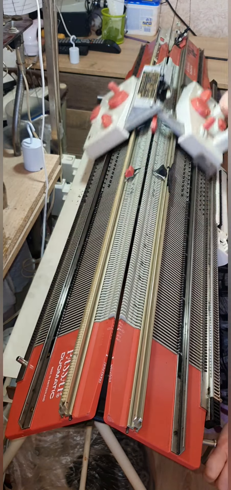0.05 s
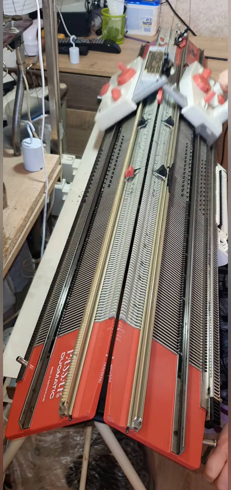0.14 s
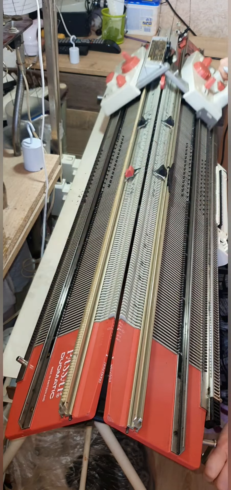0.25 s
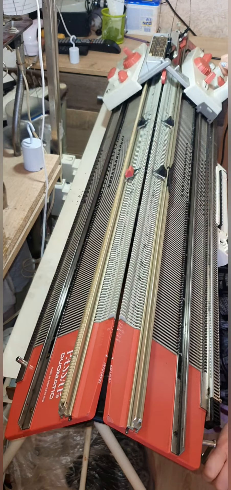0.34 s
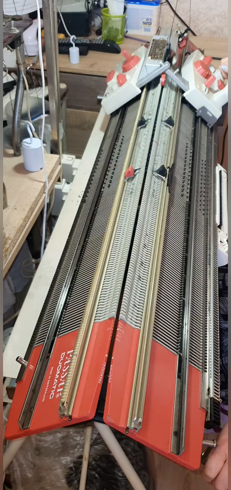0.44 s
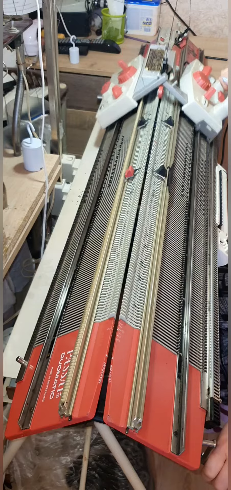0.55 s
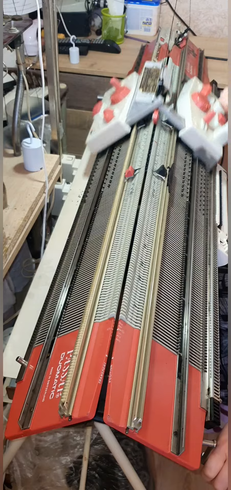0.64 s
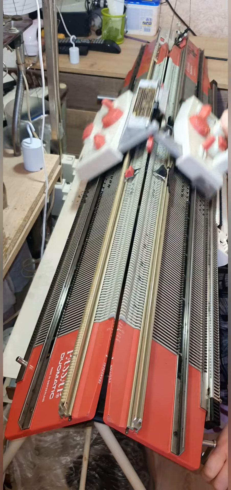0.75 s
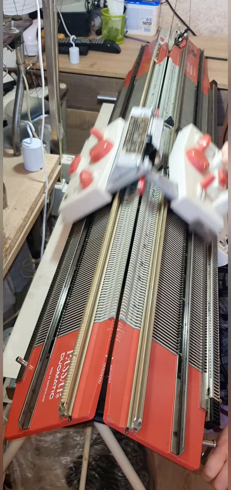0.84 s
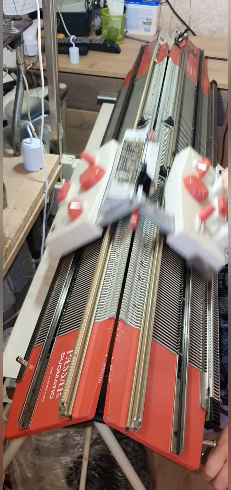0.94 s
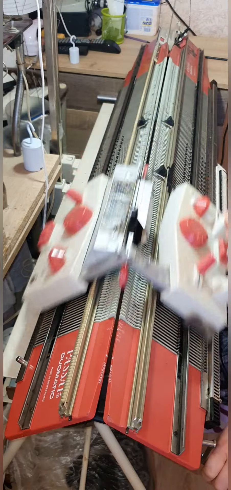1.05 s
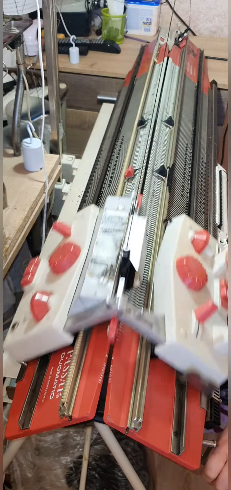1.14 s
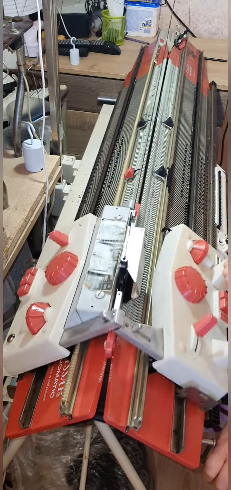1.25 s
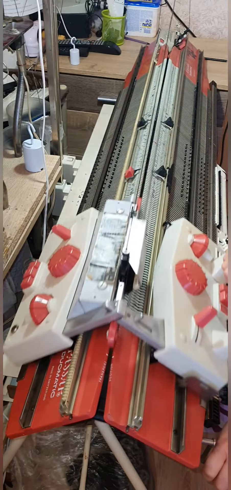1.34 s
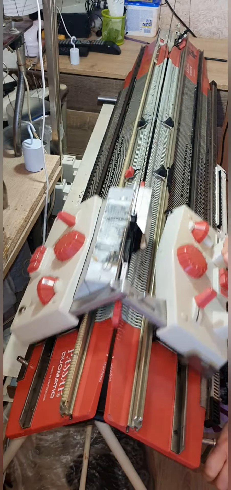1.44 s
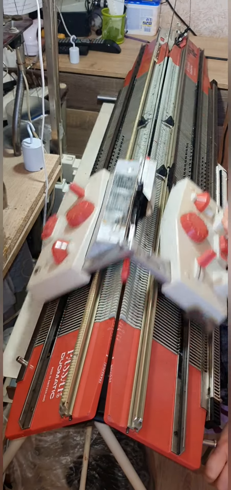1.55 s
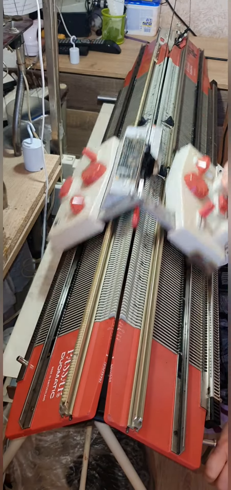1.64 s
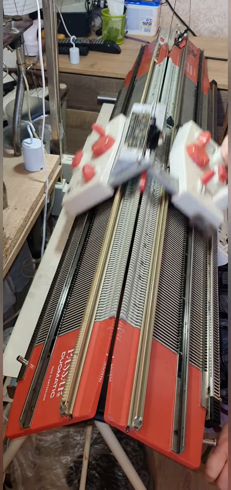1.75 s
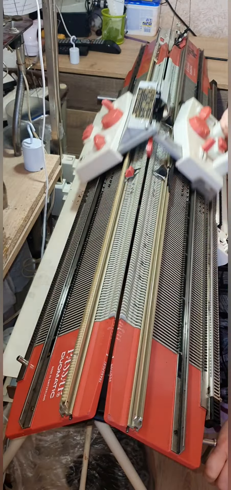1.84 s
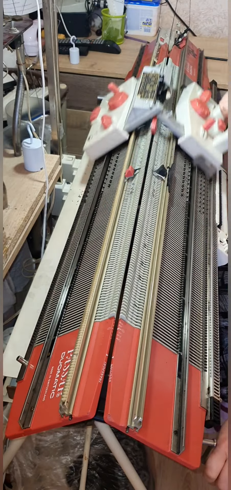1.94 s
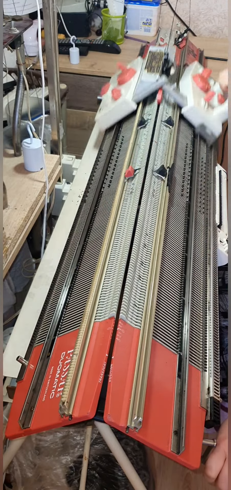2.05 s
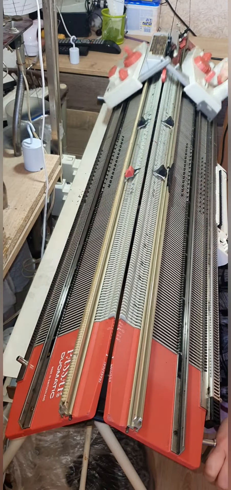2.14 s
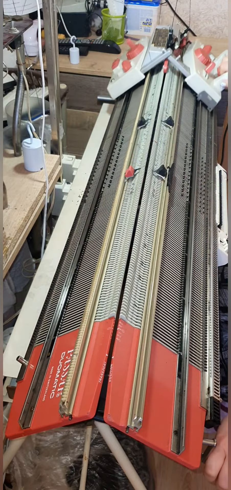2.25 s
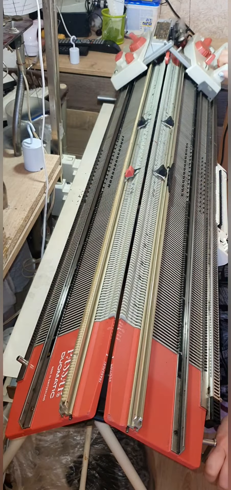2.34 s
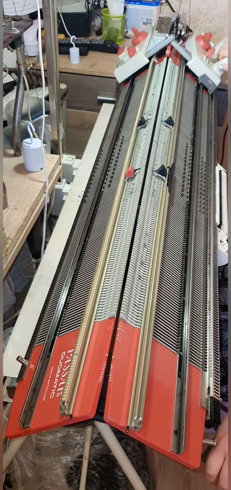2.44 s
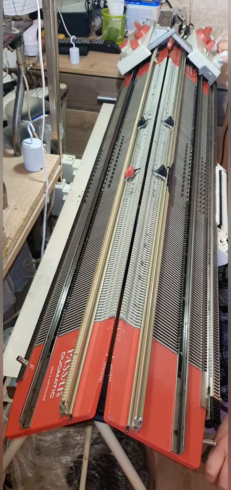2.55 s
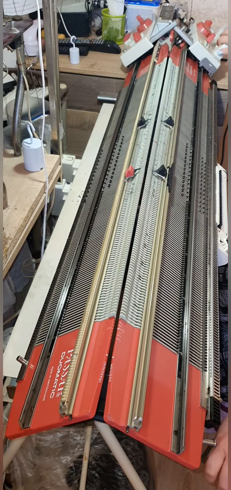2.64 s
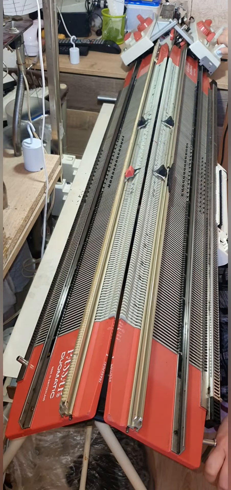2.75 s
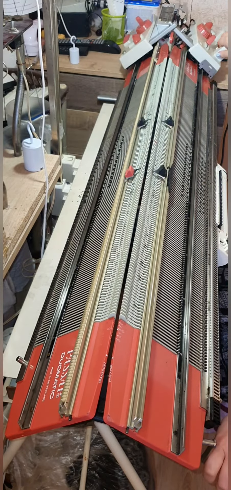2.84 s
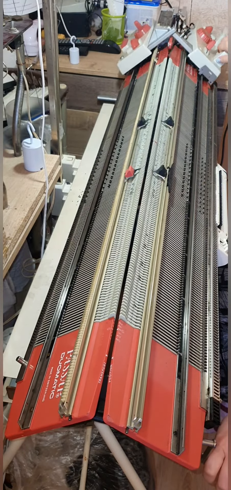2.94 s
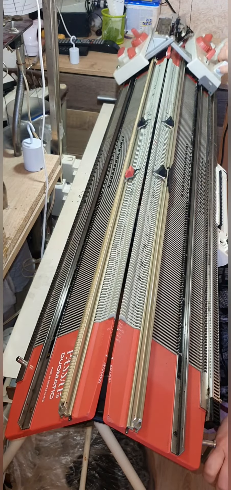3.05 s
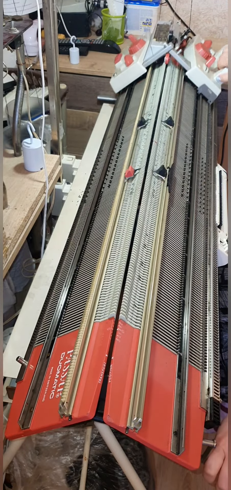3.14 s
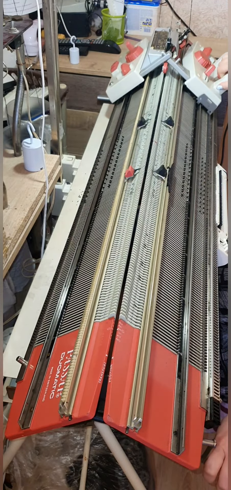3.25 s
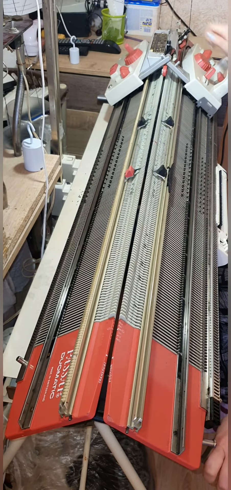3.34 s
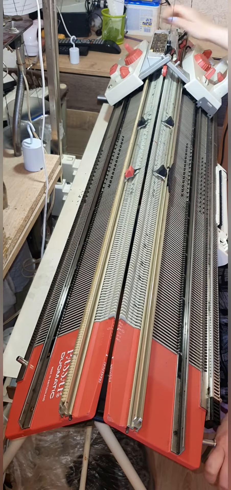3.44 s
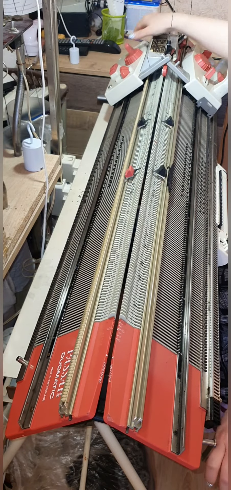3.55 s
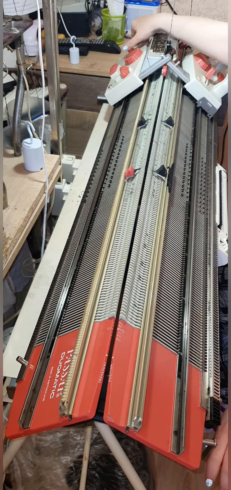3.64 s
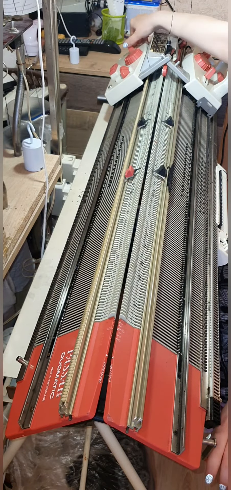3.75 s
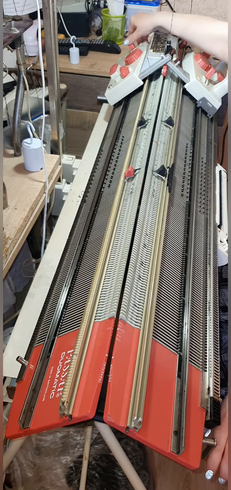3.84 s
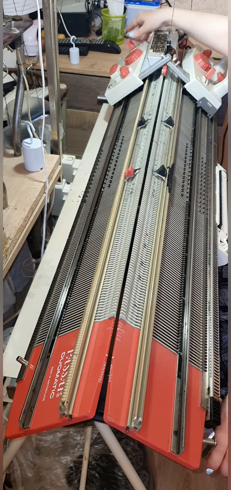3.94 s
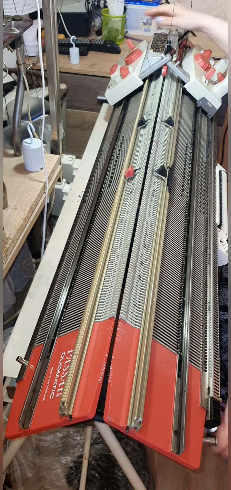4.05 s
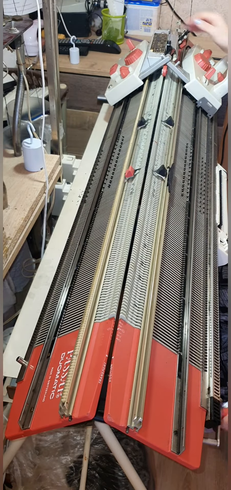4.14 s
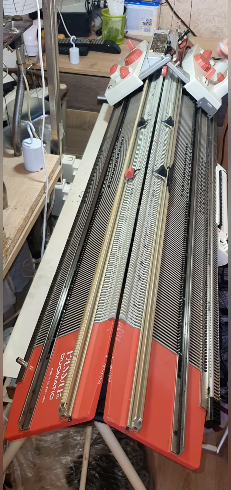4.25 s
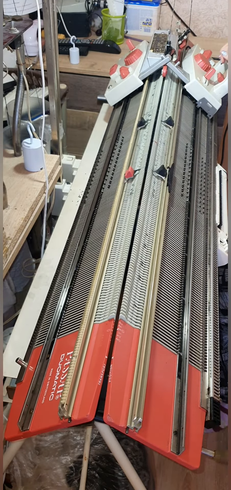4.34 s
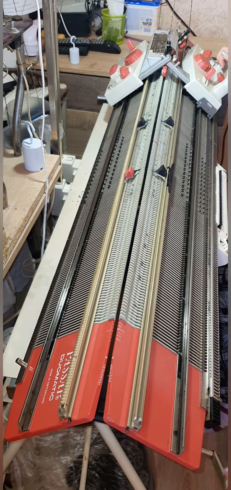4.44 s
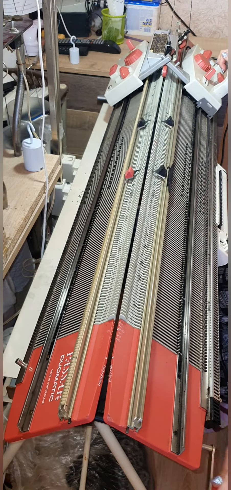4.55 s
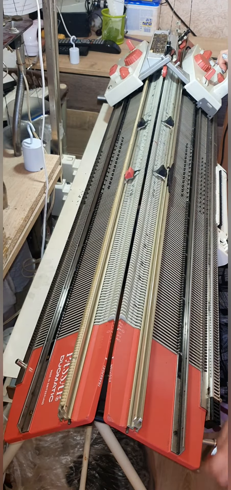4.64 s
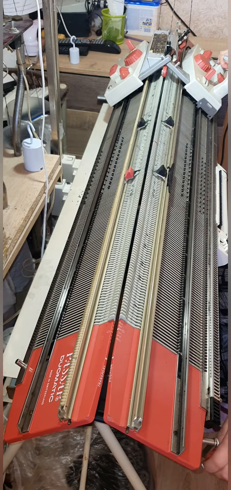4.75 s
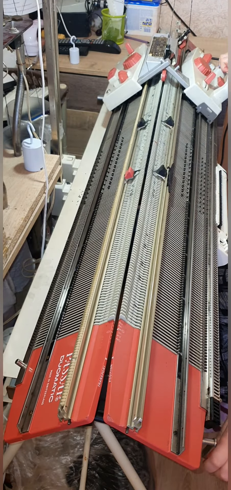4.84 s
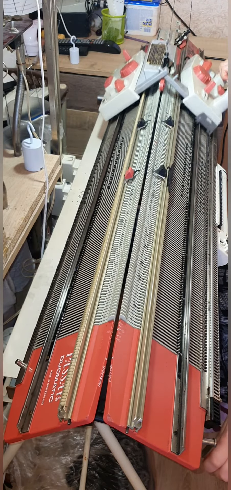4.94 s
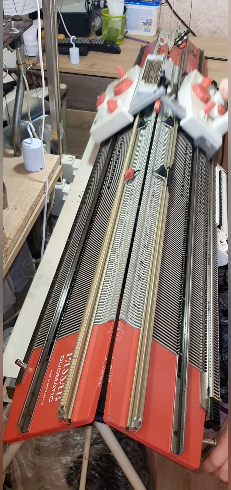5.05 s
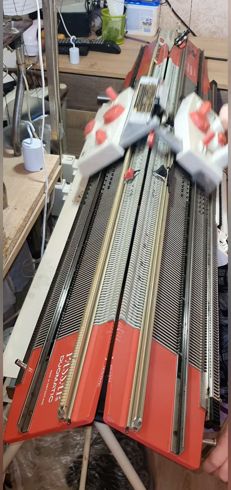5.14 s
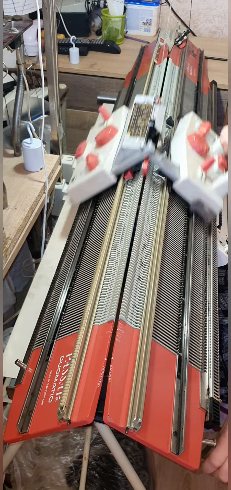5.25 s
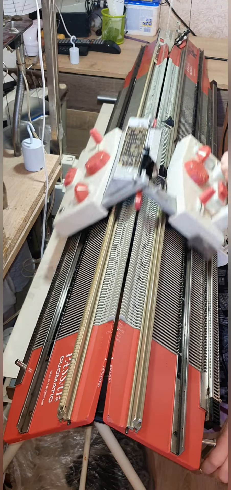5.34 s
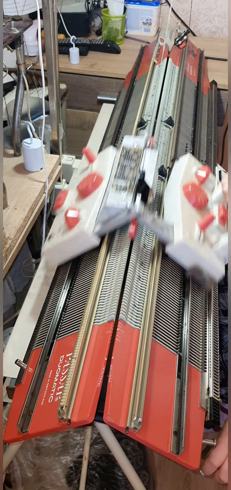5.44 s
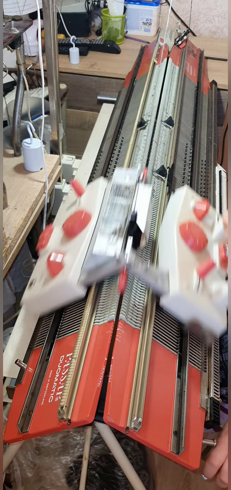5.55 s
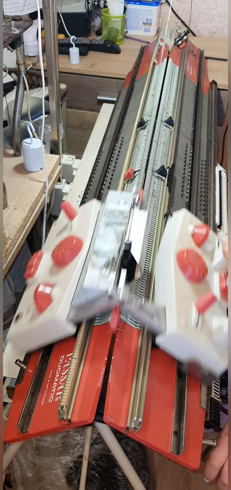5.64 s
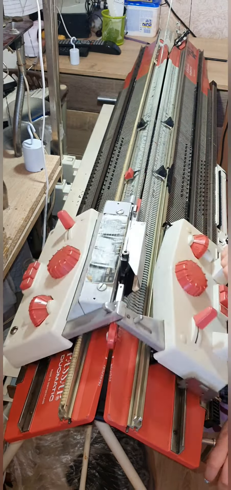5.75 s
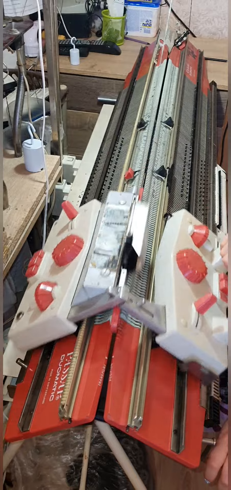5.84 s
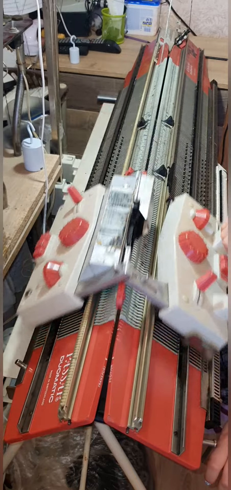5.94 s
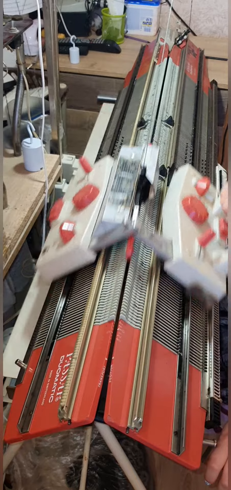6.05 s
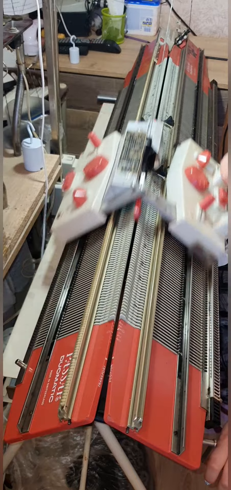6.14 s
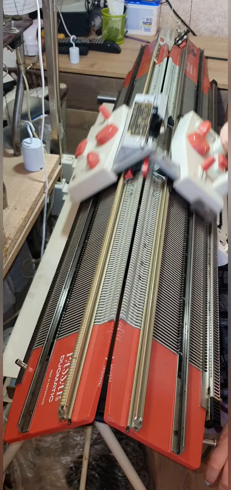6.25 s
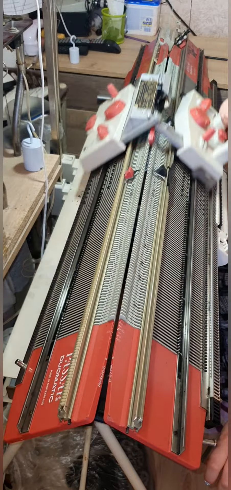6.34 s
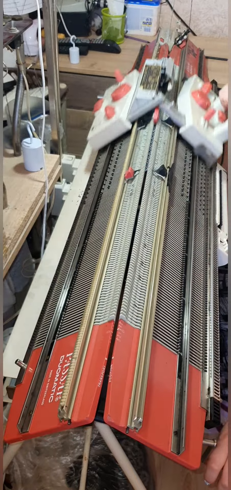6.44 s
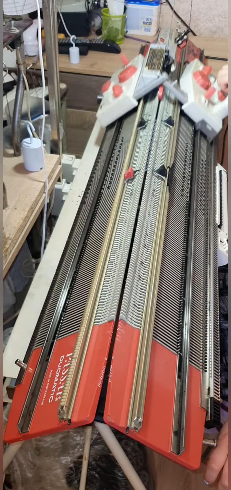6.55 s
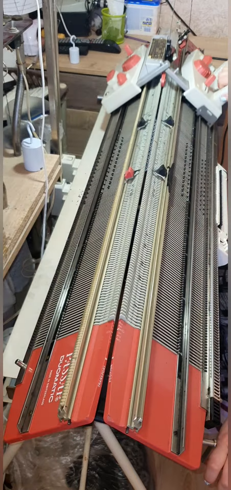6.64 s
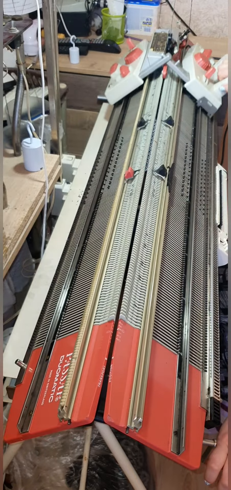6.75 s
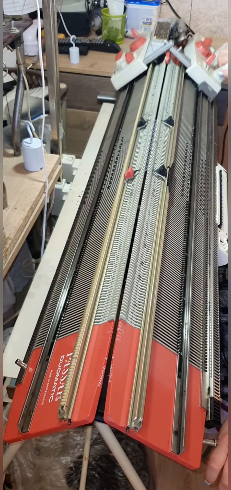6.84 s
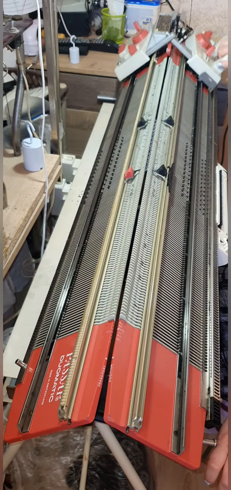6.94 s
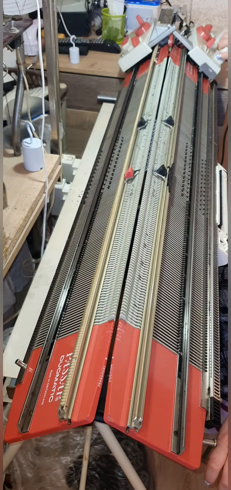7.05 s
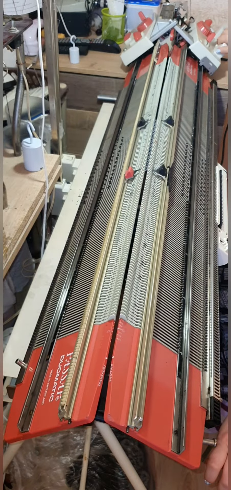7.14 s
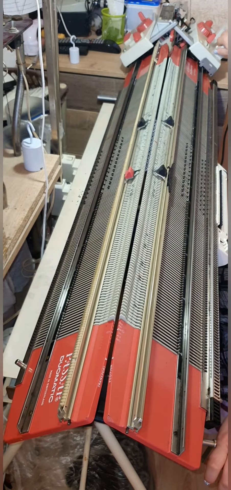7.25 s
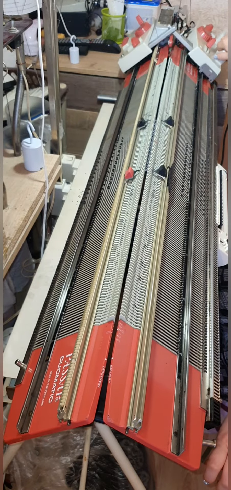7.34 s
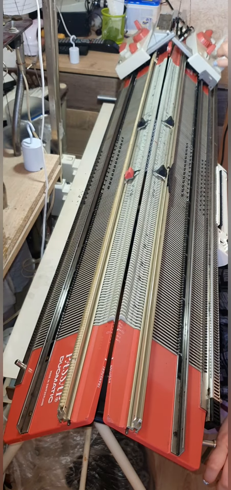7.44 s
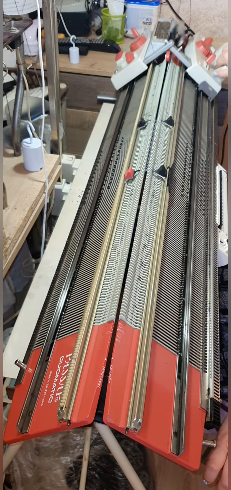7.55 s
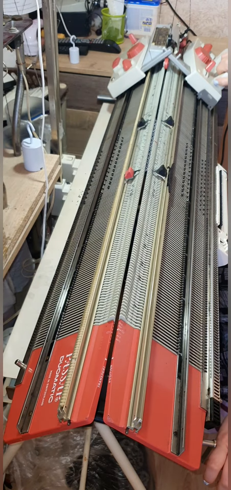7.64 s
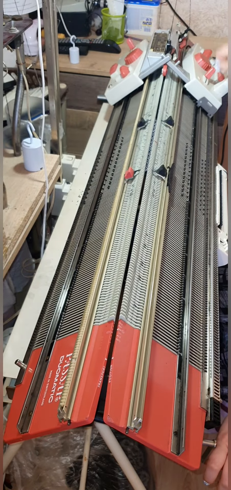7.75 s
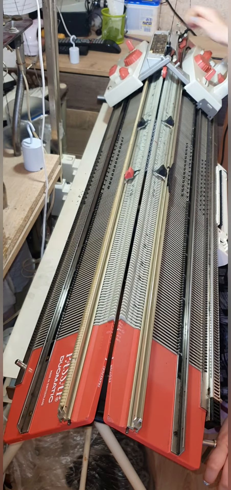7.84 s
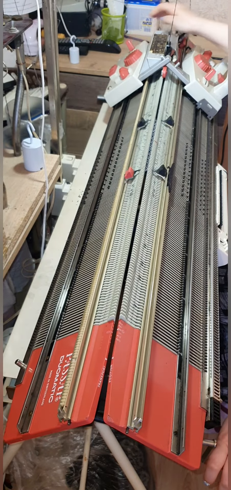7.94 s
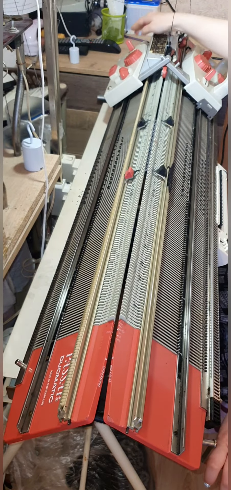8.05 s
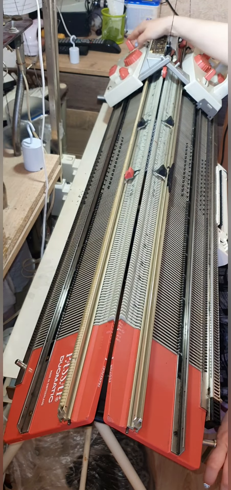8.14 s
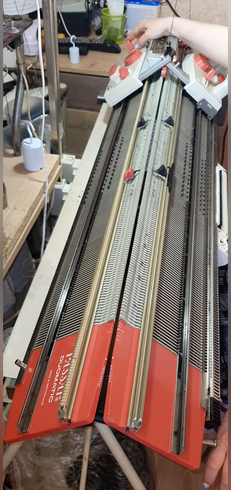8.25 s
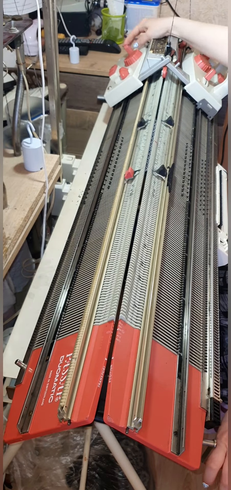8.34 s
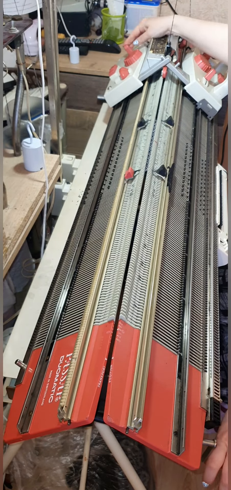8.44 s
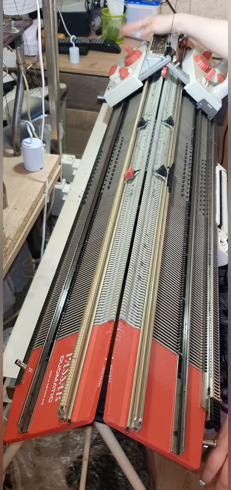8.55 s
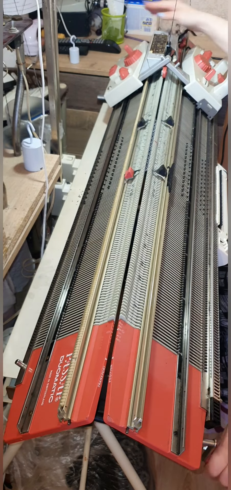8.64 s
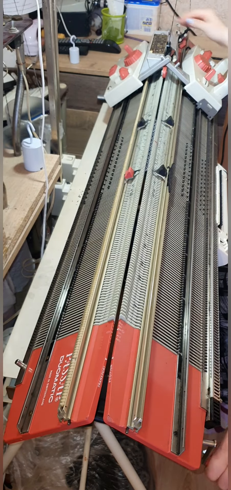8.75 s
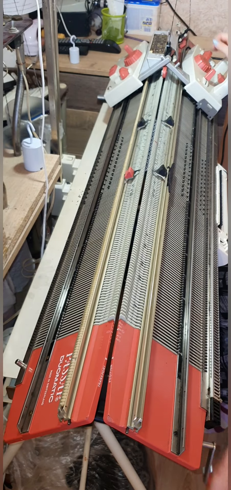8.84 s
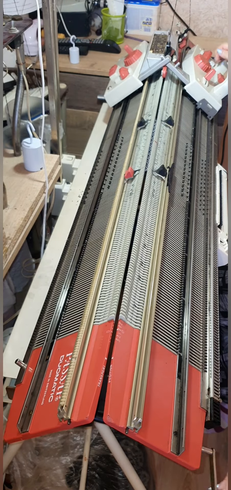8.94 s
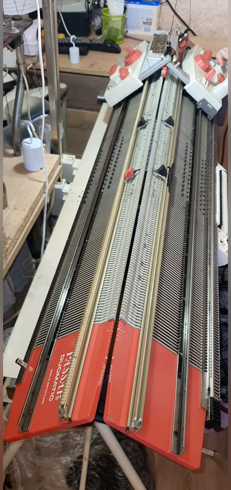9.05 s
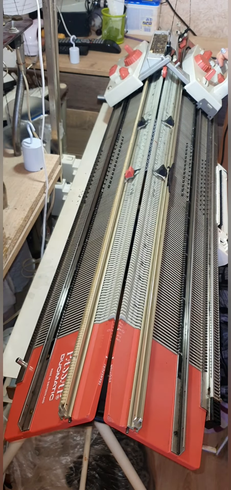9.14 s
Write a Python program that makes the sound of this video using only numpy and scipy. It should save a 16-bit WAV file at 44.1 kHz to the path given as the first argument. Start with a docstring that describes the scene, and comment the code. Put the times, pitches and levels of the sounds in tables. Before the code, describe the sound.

In a small room, close to the machine, metal needles chatter in coarse bursts as a carriage slides out and back. Loud snapping clacks mark the turns, and a jumble of knocks and rail scrapes comes at the far end. Then it falls almost silent apart from sparse clicks, before another pair of rasping sweeps, more clattering knocks and a final quiet stretch.

```python
"""Knitting machine carriage pushed by hand along two metal needle beds: noise in dense ticks makes the rattle
of needles on cams and the tinkle of latches, heard through resonant shell and beds, with sliding rails between.
Cams, latches and stops clack as fading showers of ticks ringing case modes; a wooden stand rumbles and thuds.
A small room answers with decaying noise over faint air noise and hum; a phone with two ports listens at the
end of the bed, rounding peaks and cutting the top."""
import sys
import numpy as np
from scipy import signal
from scipy.fft import rfft, irfft, next_fast_len
from scipy.io import wavfile

SR = 44100
rng = np.random.default_rng(int(sys.argv[2]) if len(sys.argv) > 2 else 0)


def wav_record(signal):
    """Record a signal, one row per channel, as 16-bit PCM in the file named by sys.argv[1]."""
    frames = np.transpose(np.atleast_2d(signal))
    bounded = np.clip(frames, -1, 1)
    # unit amplitude maps onto the largest positive 16-bit level
    quanta = np.round(bounded * 32767).astype(np.int16)
    wavfile.write(sys.argv[1], SR, quanta)


N = 406161
TIME_S = np.arange(N) / SR

# All levels are relative: later gains add to them.
# Passes over the working needles: [start/s, length/s, rattle level/dB, rise/s, sag over pass/dB,
# stand rumble re rattle/dB]
PASSES = [(-0.15, 0.38, -20.5, 0.13, 2, -19), (0.744, 0.36, -19.5, 0.079, 5.5, -20),
          (1.686, 0.45, -22.5, 0.082, -0.5, -20), (5.156, .405, -20.5, 0.069, 3, -22.5),
          (6.142, 0.43, -20.5, 0.069, 3, -21)]
# Carriage sliding, creeping through the yarn changer, resting: [t/s, rail level/dB, treble re rail/dB]
SLIDE = [(0.0, -36.5, -16), (0.32, -38, 0), (0.35, -42.5, 3.5), (0.43, -44, 1.5), (0.47, -52.5, 4),
         (0.63, -39.5, -4), (0.67, -43.5, -11), (0.74, -37.5, -1), (1.12, -40, -1), (1.19, -41, 2),
         (1.38, -54, 6.5), (1.49, -46, 7.5), (1.6, -46.5, -9), (1.69, -38, -4.5), (2.2, -39.5, -2.5),
         (2.3, -42, -0.5), (2.35, -49, 4.5), (2.43, -41, 1), (2.63, -41, -9.5), (2.76, -31, -1.5),
         (2.84, -52, -15.5), (2.99, -40, -14.5), (3.11, -36.5, 1.5), (3.15, -38.5, 5.5), (3.24, -56.5, 2),
         (3.4, -58.5, -9), (3.49, -75, -4.5), (3.74, -71.5, -6), (3.86, -57, -19), (4.04, -72.5, -7.5),
         (4.7, -71.5, -6), (4.84, -66, 0), (5.04, -40.5, -4), (5.16, -41.5, -3.5), (5.61, -40, -1),
         (5.711, -37.5, -5), (5.77, -55, 1), (5.86, -56.5, -2), (5.94, -47, 7), (6.08, -48, -4),
         (6.15, -39, -4), (6.59, -36, -11), (6.72, -45.5, -2), (6.83, -53, -4.5), (6.94, -35.5, -4),
         (6.98, -37, -18), (7.12, -37, 3), (7.26, -47, -15), (7.36, -49, -3.5), (7.56, -37.5, 2),
         (7.61, -42.5, 8), (7.73, -53.5, -11), (7.97, -75, -3), (8.35, -69.5, -4.5), (8.7, -76.5, -4),
         (9.21, -68.5, -5)]
# Spectrum of needles and clacks: [f/Hz, density/dB per Hz]
METAL_SPECTRUM = [(140, -46), (230, -17.5), (334, -3), (413, -6.5), (460, -1.5), (511, -2), (729, -0.5),
                  (797, -0.5), (1260, -0.5), (3180, -3), (8600, -7.5), (11800, -9.5), (16000, -9.5)]
# Spectrum of the rails alone: [f/Hz, density/dB per Hz]
RAIL_SPECTRUM = [(140, -44), (230, -13), (365, -5.5), (460, -2.5), (589, -7.5), (655, -0.5), (783, -2.5),
                 (1080, -1), (1590, -8.5), (3020, -6.5), (3940, -8.5), (7870, -10.5), (10300, -18.5),
                 (12700, -9.5), (16000, -15)]
# Damped modes of shell and beds: [f/Hz, width/Hz, level/dB]
BODY_MODES = [(460, 45, -6), (640, 60, -3), (800, 60, -2), (980, 60, -4), (1220, 70, 0), (1400, 70, -3),
              (1780, 70, -4), (1950, 70, -4), (2300, 70, -4), (2650, 80, -5), (2950, 80, -3),
              (3300, 80, -6), (3900, 90, -5), (4700, 100, -7), (5400, 100, -7), (6000, 110, -7),
              (6600, 120, -6), (7250, 120, -5), (7750, 120, -6), (9600, 150, -9), (12000, 150, -8),
              (13900, 150, -8)]
# Modes of the wooden stand: [f/Hz, width/Hz, level/dB]
STAND_MODES = [(56.4, 10, 1), (83.5, 31, -1), (137, 25, 6.5), (187, 120, -4.5)]
# Left-right difference re sum: [f/Hz, level/dB]
SIDE_DB = [(60, -15), (110, -15), (200, -13), (380, -6), (700, 3), (1290, 3), (2380, 1), (4400, 1),
           (8120, -2), (15000, -4)]
# Spectrum of the air noise: [f/Hz, density/dB per Hz]
AIR_SPECTRUM = [(15, -30.5), (25, 5.5), (84, 2.5), (123, -17.5), (229, -10.5), (384, -5), (416, -10),
                (1070, -15.5), (1840, -22.5), (2550, -27), (8590, -38.5), (14800, -43.5), (16000, -43.5)]
# Wavering hum: [f/Hz, width/Hz, level/dB]
HUM = [(540, 12, -72), (1045, 20, -82)]
# Clacks of cams, latches, levers: [t/s, peak level/dB, thud re peak/dB, sizzle re peak/dB, ring re peak/dB,
# ring focus above lowest mode/octaves, decay t60/s]
CLACKS = [(0.495, -36, -17, 2.5, -12.5, .6, 0.55), (0.563, -16, -25, 0.5, -13, 0.54, .09),
          (0.58, -19.5, -31, -3, -6.5, 1.7, 0.056), (0.757, -25, -36, 2.5, -9, 1.5, 0.25),
          (1.044, -12, -53, -3.5, -13.5, 1.7, 0.2), (1.151, -30, -39, -26, -5, 1.1, .13),
          (1.2, -31.5, -42, -9, -11, 1.9, 0.24), (1.471, -36, -13.5, 5, -8, 2.6, .14),
          (1.501, -12, -14.5, -4.5, -13.5, 1.4, .18), (1.639, -32.5, -30.5, 2, -12, 1.5, 0.1),
          (1.671, -30, -27, -1.5, -9, 1.5, 0.11), (1.7, -25.5, -31, -2, -11, 1.5, 0.092),
          (2.432, -22.5, -12, -5, -14.5, 1, .32), (2.523, -27, -21, -2, -9.5, 1.8, 0.13),
          (2.594, -14.5, -14, -15, -12.5, 1.8, 0.3), (2.62, -18.5, -22, -10, -13.5, 2.3, 0.12),
          (2.679, -17, -14.5, -31.5, -5.5, 0.6, 0.14), (2.724, -12.5, -13.5, -8.5, -11, 1.6, 0.19),
          (2.748, -15, -28.5, -7, -14, 0.2, .15), (2.89, -34, -25, -12.5, -3, .9, .18),
          (2.915, -10.5, -17, -10, -7, 2.2, 0.19), (3.041, -27.5, -15.5, -1.5, 0, 0.83, .09),
          (3.086, -25.5, -42, 6.5, -7.5, 1.6, .1), (3.151, -24.5, -18, 0, -10.5, 1.4, 0.31),
          (3.191, -9.5, -18.5, -0.5, -18, 5.5, 0.083), (3.215, -17, -28.5, -4.5, -9, 2.2, 0.17),
          (3.699, -51, -18, -13, -6, .7, 0.12), (3.729, -39.5, -36, -16, -6.5, 1.7, 0.164),
          (3.777, -39, -37, -8.5, -12, 2, 0.34), (3.845, -39, -31, -12, -9, 1.3, .1),
          (3.851, -16.5, -28.5, -10.5, -14, 2.5, 0.14), (3.978, -42.5, -37, -16.5, 2.5, 2.2, 0.12),
          (4.126, -42.5, -33, -26, -22, 2.6, 0.15), (4.383, -31, -17, -15, -11, 1.75, 0.15),
          (4.398, -41, -19, -28, 4, .05, .16), (4.732, -25.5, -20, -24, -23, 1.54, .18),
          (4.757, -50, -28, -18, 1, 3.3, 0.095), (5.178, -23, -28, 0.5, -13.5, 1.5, 0.27),
          (5.525, -11.5, -35, -4, -9.5, 1.63, 0.19), (5.886, -46.5, -38, 4, -8, 1.9, 0.26),
          (5.94, -36, -15, 4, -4, 2.3, 0.17), (5.965, -12, -16.5, -5, -11.5, .7, .18),
          (6.088, -32, -30, -2, -7, 1.5, 0.24), (6.12, -31.5, -33.5, -5, -7, 1.5, 0.12),
          (6.156, -24.5, -32.5, -1, -11, 1.5, 0.18), (6.474, -14.5, -37, -7.5, -16.5, .9, .27),
          (6.73, -29.5, -16, 1, -10.5, 2.2, 0.1), (6.822, -32, -13, -39, -0.5, 0.37, .16),
          (6.92, -26.5, -8, -5, -7.5, 0.46, 0.14), (6.938, -15, -30, 1, -9, 1.84, .16),
          (7.029, -32.5, -16.5, 8.5, -5, .6, 0.13), (7.088, -15, -16, -17.5, -14.5, .9, 0.51),
          (7.129, -20.5, -12.5, -16.5, -20, 0.99, .18), (7.181, -13, -19.5, -6, -12, 1.9, .15),
          (7.207, -15.5, -31, -9.5, -4.5, 0.55, 0.12), (7.257, -32, -16.5, -16.5, -4.5, 1.1, 0.053),
          (7.31, -45.5, -18, -20.5, -10.5, 1.4, 0.41), (7.355, -9.5, -23, -10.5, -8.5, 2.19, .2),
          (7.45, -25, -9.5, -33, -5.5, 0.79, 0.095), (7.518, -34.5, -23, 1.5, -12, 1.7, 0.15),
          (7.567, -22, -28.5, -2.5, -15.5, 1.3, .33), (7.636, -9.5, -16, -2.5, -25.5, 2.3, 0.14),
          (7.663, -17.5, -22, -7.5, -10, 0.9, 0.13), (7.808, -47, -12, -19, -16, 1.25, .18),
          (8.282, -46.5, -26, -18, -12, 2, 0.18), (8.313, -41.5, -25, -21, -14, 3.2, 0.078),
          (8.387, -38, -30, -2.5, -14, 1.6, 0.26), (8.397, -21.5, -37, -5.5, -8.5, 1.85, .15),
          (8.585, -66, -20, -24, -3, 0.85, 0.17), (8.622, -54.5, -27, -17, 1, 0.98, 0.063),
          (8.784, -43.5, -37, -11, -5, 1.64, 0.087), (8.889, -54.5, -1, -24, -3.5, 0.72, 0.21),
          (8.931, -42.5, -28, -21, -6.5, 2.8, 0.14), (9.006, -52, -24, -28, -3, 0.24, 0.14),
          (9.167, -21.5, -18.5, -13.5, -9, 1.4, 0.14)]
# Modes of case, covers and levers: [f/Hz, width/Hz, level/dB]
CLACK_MODES = [(459, 100, 0.5), (686, 180, -3.5), (867, 43, -3.5), (1164, 140, -2.5), (1780, 450, -2),
               (2230, 400, -1.5), (2843, 110, 3), (3980, 600, -0.5), (5000, 600, 0.5)]

PASS_EDGE_DB, PASS_FALL_S = -18, 0.065  # the cams meet and leave the needles a few at a time
LATCH_DB, LATCH_FADE_DB = 4.5, 7  # re needles; latches tinkle most as a pass begins
PUSH_WANDER_DB, PUSH_WANDER_PER_S = 2.1, 40  # the hand's push is uneven
SLIDE_RUMBLE_DB, RUMBLE_WANDER_DB, RUMBLE_WANDER_PER_S = -20.5, 2.5, 16
RATTLE_FROM_DB, RATTLE_FULL_DB = -38, -31  # levels between which needles take over from the rails
NEEDLES_PER_S, NEEDLE_SCATTER_DB = 2500, 0.5
LATCHES_PER_S, LATCH_SCATTER_DB = 7400, 1.5
TICK_T60_S = 0.007
SIZZLE_HZ, CLACK_SIZZLE_HZ = 4460, 3520  # small steel parts above, shell below
BODY_DB, RAIL_BODY_DB = -19.5, -17
BODY_WANDER_DB, BODY_WANDER_PER_S = 12, 16
CLACKS_TICKS_PER_S, CLACK_SCATTER_DB, CLACK_PAN_DB = 4300, 0.5, 0.63
CLACK_RISE_S, STEEL_RISE_S, FADE_POWER = 0.0022, 0.0041, 1.17
FOCUS_DB_PER_OCT2 = 17.5
THUD_T60_S, THUD_LAG_S = 0.25, 0.009
ROOM_T60_S, ROOM_DB, AIR_DB = 0.15, -16.5, -66.5
TOP_HZ = 15750


def undb(db):
    """Amplitude ratio of a level in dB."""
    return 10 ** (np.asarray(db) / 20)


def unit(x):
    """Scale to RMS 1."""
    return x / np.sqrt(np.mean(x ** 2))


def shape(x, gain):
    """Filter by a real gain given as a function of frequency."""
    size = next_fast_len(x.shape[-1])
    hz = np.maximum(np.arange(size // 2 + 1) * SR / size, 1)
    return irfft(rfft(x, size) * gain(hz), size)[..., :x.shape[-1]]


def on_log(table):
    """Straight lines on a log-frequency axis."""
    hz, value = np.transpose(table)
    return lambda f: np.interp(np.log(f), np.log(hz), value)


def colour(x, table):
    """Shape by a spectrum table, steep outside it, keeping the power of white input."""
    points = [(table[0][0] / 2, -70)] + list(table) + [(table[-1][0] * 2, -70)]

    def gain(f):
        return undb(on_log(points)(f))

    power = np.mean(gain(np.linspace(1, SR / 2, num=4000)) ** 2)
    return shape(x, gain) / np.sqrt(power)


def resonate(x, hz, width_hz):
    """Two-pole resonance that keeps the power of white input."""
    b, a = signal.iirpeak(hz, hz / width_hz, fs=SR)
    return signal.lfilter(b, a, x) / np.sqrt(np.pi * width_hz / SR)


def ring(x, modes):
    """Sum of resonances with alternating signs."""
    power = sum(undb(db) ** 2 * width_hz for _, width_hz, db in modes)
    out = 0
    for k, (hz, width_hz, db) in enumerate(modes):
        gain = (-1) ** k * undb(db) * np.sqrt(width_hz / power)
        out = out + gain * resonate(x, hz, width_hz)
    return out


def walk(per_s):
    """Random levels joined by straight lines."""
    knots_s = np.arange(0, N / SR + 1, 1 / per_s)
    return np.interp(TIME_S, knots_s, rng.standard_normal(len(knots_s)))


def ports(mid, side):
    """Two unrelated versions of a sound become the sum and difference of left and right."""
    return mid + shape(side, lambda f: undb(on_log(SIDE_DB)(f))) * np.array([[1], [-1]])


def spread():
    """Noise as it reaches both ports from many places along the beds."""
    return ports(*rng.standard_normal((2, N)))


def ticks(per_s, scatter_db):
    """Strength over time of random steel-on-steel ticks: short bursts, a few stronger than the rest."""
    when, size = rng.random((2, N))
    power = (when < per_s / SR) * undb(-2 * scatter_db * np.log(size))
    decay = undb(-2 * 60 / (TICK_T60_S * SR))
    return unit(np.sqrt(signal.lfilter([1], [1, -decay], power)))


def blend(low, high, border_hz):
    """Shell below the border, small steel parts above."""
    def share(f):
        return 1 / (1 + (f / border_hz) ** 6)

    return undb(4.5) * shape(low, share) + undb(5.5) * shape(high, lambda f: 1 - share(f))


def motion():
    """Levels in dB of rattle, rumble and sizzle: sliding, overtaken by each pass over the needles."""
    t_s, slide_db, treble_db = np.transpose(SLIDE)
    rattle_db = np.interp(TIME_S, t_s, slide_db)
    sizzle_db = rattle_db + np.interp(TIME_S, t_s, treble_db)
    rumble_db = rattle_db + SLIDE_RUMBLE_DB
    for start_s, length_s, db, rise_s, sag_db, stand_db in PASSES:
        corners_s = start_s + np.array([0, rise_s, length_s - PASS_FALL_S, length_s])
        outline_db = [PASS_EDGE_DB, 0, -sag_db, PASS_EDGE_DB]
        needles_db = db + np.interp(TIME_S, corners_s, outline_db, left=-np.inf, right=-np.inf)
        latches_db = needles_db + LATCH_DB - LATCH_FADE_DB * (TIME_S - start_s) / length_s
        rattle_db = np.maximum(rattle_db, needles_db)
        rumble_db = np.maximum(rumble_db, needles_db + stand_db)
        sizzle_db = np.maximum(sizzle_db, latches_db)
    push_db = PUSH_WANDER_DB * walk(PUSH_WANDER_PER_S)
    rumble_db = rumble_db + RUMBLE_WANDER_DB * walk(RUMBLE_WANDER_PER_S)
    return rattle_db + push_db, rumble_db, sizzle_db + push_db


def carriage_ticks(rattle_db, sizzle_db):
    """Needle butts knock the cams while their latches tinkle on their own; split into needles and rails."""
    butts = undb(rattle_db) * ticks(NEEDLES_PER_S, NEEDLE_SCATTER_DB) * spread()
    latches = undb(sizzle_db) * ticks(LATCHES_PER_S, LATCH_SCATTER_DB) * spread()
    busy = np.clip((rattle_db - RATTLE_FROM_DB) / (RATTLE_FULL_DB - RATTLE_FROM_DB), 0, 1)
    needles = blend(np.sqrt(busy) * butts, np.sqrt(busy) * latches, SIZZLE_HZ)
    rails = blend(np.sqrt(1 - busy) * butts, np.sqrt(1 - busy) * latches, SIZZLE_HZ)
    return needles, rails


def body(x):
    """Modes of shell and beds; which ones speak changes with the place that is struck."""
    out = 0
    for hz, width_hz, db in BODY_MODES:
        mode_db = db + BODY_WANDER_DB * np.tanh(walk(BODY_WANDER_PER_S))
        out = out + resonate(x * undb(mode_db), hz, width_hz)
    return out / np.sqrt(np.sum(undb(np.array(BODY_MODES)[:, 2]) ** 2))


def sliding_rails(rails):
    """Rail noise with its own spectrum, plus the ringing beds."""
    rails = undb(-2.5) * colour(rails, RAIL_SPECTRUM)
    return rails + undb(RAIL_BODY_DB) * body(rails)


def wooden_stand(thuds, rumble_db):
    """Low noise, driven by thuds and rumble, rings the stand's modes."""
    shaking = shape(spread(), lambda f: f < 300)
    return undb(4.0) * ring((thuds + undb(rumble_db)) * shaking, STAND_MODES)


def tail(t60_s):
    """Unit-energy burst of decaying noise."""
    t_s = np.arange(int(t60_s * SR)) / SR
    h = rng.standard_normal(len(t_s)) * undb(-60 * t_s / t60_s)
    return h / np.sqrt(np.sum(h ** 2))


def room(x):
    """The walls answer, duller: two unrelated noise tails with falling treble."""
    mono = x.mean(axis=0)
    far = [signal.fftconvolve(mono, tail(ROOM_T60_S))[:N] for _ in range(2)]
    return x + undb(ROOM_DB) * shape(ports(*far), lambda f: 1 / (1 + f / 5000))


def room_tone():
    """Faint air noise, and hum as narrow resonances of noise."""
    air = undb(AIR_DB) * colour(rng.standard_normal((2, N)), AIR_SPECTRUM)
    for hz, width_hz, db in HUM:
        air = air + undb(db) * resonate(rng.standard_normal((2, N)), hz, width_hz)
    return ports(air[0], air[1])


def clacks():
    """Force tracks for shell, stand and small steel parts: each force is a shower of ticks that fades out."""
    shell, stand, steel = np.zeros((3, 2, N))
    shower = ticks(CLACKS_TICKS_PER_S, CLACK_SCATTER_DB) * spread()
    lowest_hz = CLACK_MODES[0][0]
    for t0_s, db, thud_db, sizzle_db, ring_db, focus_oct, t60_s in CLACKS:
        a = int(t0_s * SR)
        b = min(N, a + int(1.5 * t60_s * SR))
        t_s = TIME_S[:b - a]
        pan_db = CLACK_PAN_DB * rng.standard_normal()
        sides = undb(db + np.array([[pan_db], [-pan_db]]) / 2)
        # fade in dB, slightly steeper toward its end
        fade = undb(-60 * (t_s / t60_s) ** FADE_POWER)
        force = shower[:, a:b] * (1 - np.exp(-t_s / CLACK_RISE_S)) * fade
        # the place struck favours the modes near its focus
        rings = []
        for hz, width_hz, mode_db in CLACK_MODES:
            off_oct = np.log2(hz / lowest_hz) - focus_oct
            gain = undb(ring_db + mode_db - FOCUS_DB_PER_OCT2 * off_oct ** 2)
            rings.append(gain * resonate(force, hz, width_hz))
        sizzle = (undb(sizzle_db) * force + sum(rings[-2:])) * (1 - np.exp(-t_s / STEEL_RISE_S))
        shell[:, a:b] += sides * (force + sum(rings))
        steel[:, a:b] += sides * sizzle
        # the stand answers late and rings on
        a = min(N - 1, a + int(THUD_LAG_S * SR))
        t_s = TIME_S[:min(N - a, int(THUD_T60_S * SR))]
        stand[:, a:a + len(t_s)] += undb(db + thud_db - 60 * t_s / THUD_T60_S)
    return shell * undb(-12), stand * undb(-4.0), steel * undb(-1.5)


def machine():
    """Needles, sliding rails and clacks, heard through shell, beds and stand."""
    rattle_db, rumble_db, sizzle_db = motion()
    needles, rails = carriage_ticks(rattle_db, sizzle_db)
    shell, thuds, steel = clacks()
    metal = colour(blend(shell, steel, CLACK_SIZZLE_HZ) + needles, METAL_SPECTRUM)
    struck = metal + undb(BODY_DB) * body(metal)
    return struck + sliding_rails(rails) + wooden_stand(thuds, rumble_db)


def scene():
    """Machine in its room, over the room tone."""
    return room(machine()) + room_tone()


def record(dry):
    """The phone rounds the loudest peaks and cuts the top."""
    rounded = np.tanh(0.54 * dry) / 0.8
    return signal.sosfilt(signal.ellip(12, 0.2, 80, TOP_HZ, fs=SR, output="sos"), rounded)


dry = scene()
out = record(dry)
wav_record(out)
```